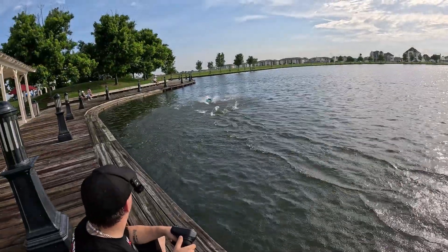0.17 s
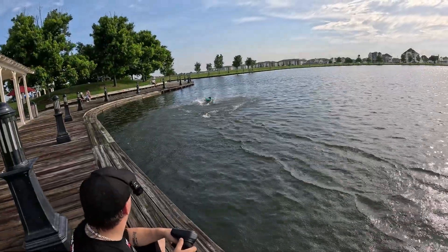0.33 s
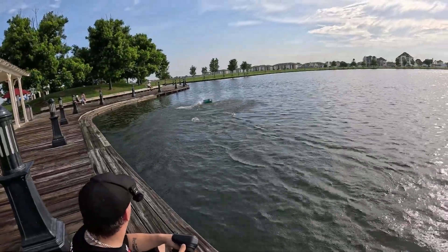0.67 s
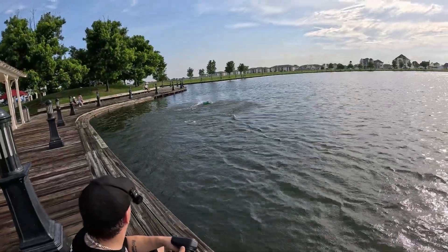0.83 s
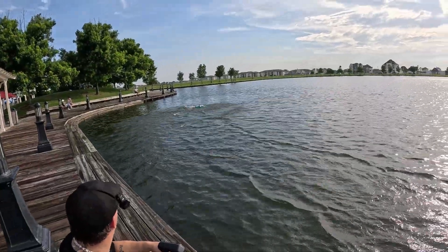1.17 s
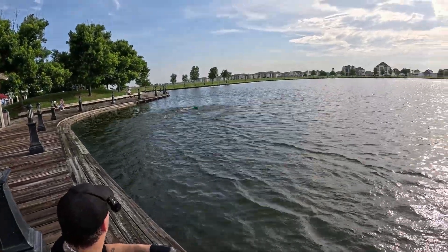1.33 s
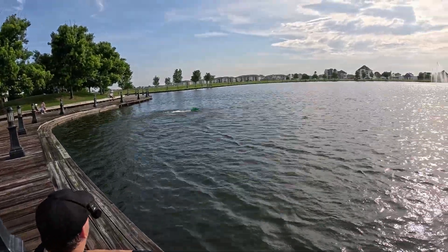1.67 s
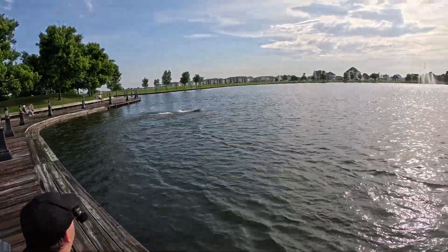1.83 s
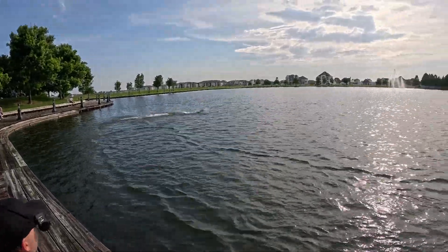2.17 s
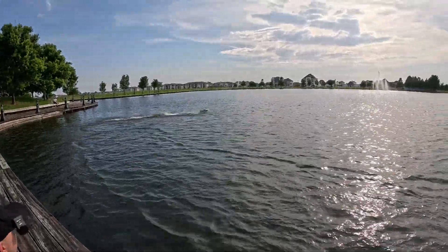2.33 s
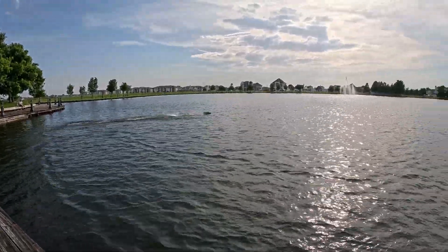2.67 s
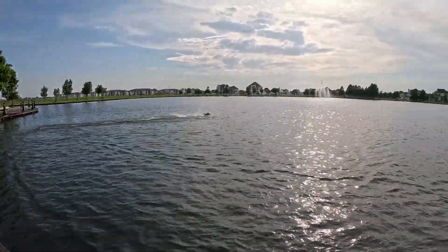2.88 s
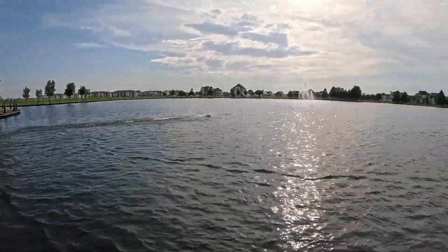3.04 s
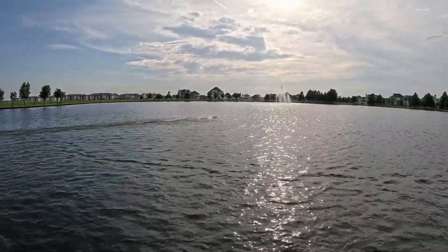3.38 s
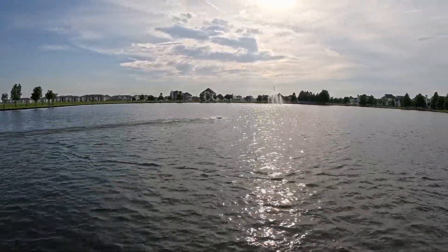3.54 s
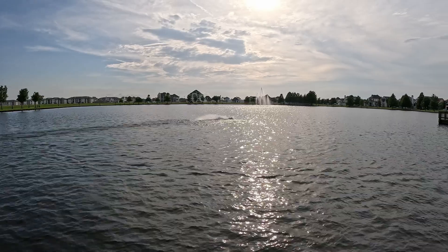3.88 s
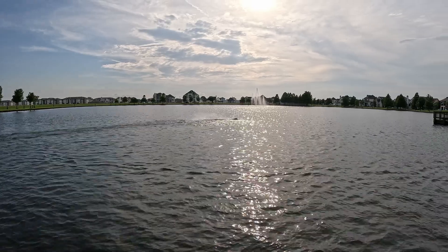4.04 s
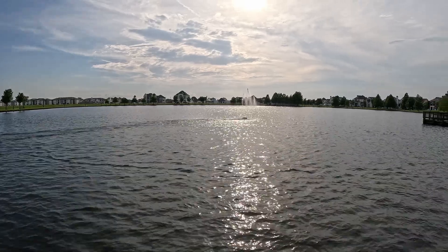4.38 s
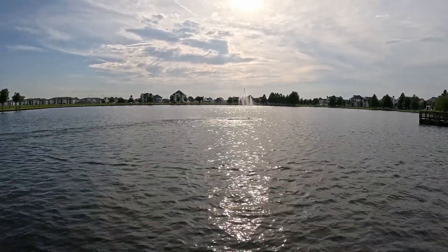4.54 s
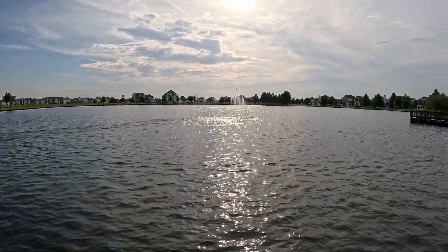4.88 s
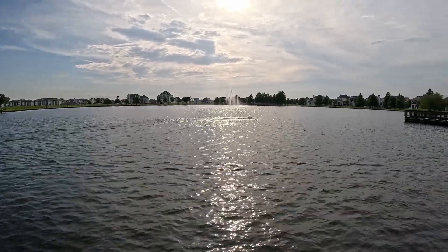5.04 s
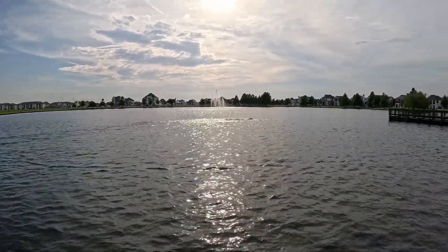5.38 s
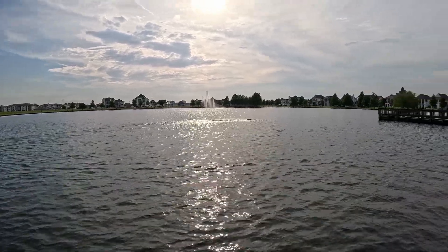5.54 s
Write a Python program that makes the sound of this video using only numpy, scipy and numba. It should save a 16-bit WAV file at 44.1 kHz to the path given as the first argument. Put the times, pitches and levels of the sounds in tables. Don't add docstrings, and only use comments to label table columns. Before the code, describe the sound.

An open pond heard from a wooden deck, with a faint low town drone throughout. From 0 to 1.1 s a toy jet boat coasts: a splash at the start, a rumbling wake that dies away, light plops at about 0.47 and 0.79 s, ticking drips and lapping. At 1.15 s its electric motor whines up, rough and fluttering, with rushing, gurgling water. From 1.64 to 3.2 s it hops repeatedly; each time the pitch leaps and smooths, then drops as the hull slaps down with spray. It cuts out near 3.3 s. A short, hard rev rises and falls from 3.6 to 3.95 s. Quiet lapping and thin far fountain hiss follow; at 4.25 s a small metal tag bounces close by, faster and fainter, for 0.15 s. A last, weaker whine runs from 5.0 to 5.45 s, with a fainter jingle at 5.17 s, a brief hop and slaps, then lapping and drips.

```python
import sys
import numpy as np
from scipy import signal
from scipy.fft import rfft, irfft
from scipy.io import wavfile
from scipy.ndimage import uniform_filter1d
from numba import njit

SR = 44100
rng = np.random.default_rng(int(sys.argv[2]) if len(sys.argv) > 2 else 0)


def linear_from_db(decibels):
    return 10 ** (np.asarray(decibels, float) / 20)


def persist_wave(psi):
    counts = np.round(np.clip(psi, -1, 1) * 32767).astype(np.int16)
    wavfile.write(sys.argv[1], SR, np.atleast_2d(counts).T)


N = 251811
T = np.arange(N) / SR


@njit
def svf(x, hz, width):
    y, band, low = np.empty(len(x)), 0., 0.
    for i in range(len(x)):
        g, k = np.tan(np.pi * hz[i] / SR), width / hz[i]
        v = (band + g * (x[i] - low)) / (1 + g * (g + k))
        band, low, y[i] = 2 * v - band, low + 2 * g * v, k * v
    return y


def unit(x):
    return x / np.sqrt(np.mean(x ** 2))


def curve(points):
    return np.interp(T, *np.transpose(points))


def walk(rate):
    hold = int(SR / rate)
    steps = np.repeat(rng.standard_normal(N // hold + 1), hold)
    return unit(uniform_filter1d(uniform_filter1d(steps, hold), hold)[:N])


def colour(x, spectrum):
    hz, db = np.transpose(spectrum)
    log_hz = np.log(np.arange(1, N // 2 + 2) * SR / N)
    gain = linear_from_db(np.interp(log_hz, np.log(hz), db, left=-80, right=-80))
    return unit(irfft(rfft(x) * gain, N))


def hiss_of(spectrum):
    return colour(rng.standard_normal(N), spectrum)


def grainy(rate, spread_db, share):
    pops = (rng.random(N) < rate / SR) * linear_from_db(spread_db * rng.standard_normal(N))
    pops = signal.lfilter([1], [1, -.98], pops) * rng.standard_normal(N)
    return np.sqrt(1 - share) * rng.standard_normal(N) + np.sqrt(share) * unit(pops)


def ring(hz, t60, count=2000):
    t = T[:count]
    return np.sin(2 * np.pi * hz * t) * np.exp(-np.log(1000) * t / t60)


def add(out, s, sound):
    i = int(s * SR)
    out[i:i + len(sound)] += sound[:N - i]


def highpass(x, order, hz):
    return signal.sosfilt(signal.butter(order, hz, "high", fs=SR, output="sos"), x)


# (frequency [Hz], level [dB per Hz])
HUM = [(12, -54), (20, -16), (27, -42), (67, -4.5), (102, -9), (155, -2.5), (200, -9.5), (236, -1),
       (265, -12.5), (300, -12), (390, -47), (660, -120)]
# (time [s], level [dB])
HUM_FADE = [(1, 2), (2.5, 0.5), (3.6, 2), (4.4, -0.5), (5.5, -0.5)]


def town_hum():
    return linear_from_db(-68 + curve(HUM_FADE) + 2.8 * walk(4.47)) * hiss_of(HUM)


def wash():
    level_db = -61 - 20 * T - 14 * np.exp(-T / 0.03) + 4.1 * walk(13.4)
    return linear_from_db(level_db) * hiss_of([(50, -33), (90, -16), (150, -4), (220, -4), (300, -36)])


# (time [s], lag [ms], strength [0-1])
MIRROR = [(2.1, .88, .03), (2.5, .88, .25), (3.2, .95, .2), (3.7, .89, .45), (4.7, .81, .4),
          (5.71, .74, .32)]


def pond_mirror(boat):
    s, lag_ms, strength = np.transpose(MIRROR)
    return np.interp(T, s, strength) * np.interp(T - np.interp(T, s, lag_ms) / 1000, T, boat)


# (time [s], strength [0-1])
DECK = [(0, .3), (1.2, .3), (1.6, .45), (2.1, .25), (3.1, .25), (3.5, 0)]


def deck_echo(boat):
    return curve(DECK) * np.interp(T - .00052, T, boat)


def far_bank(sound):
    bank = rng.standard_normal(12000) * np.exp(-np.log(1000) * T[:12000] / 0.8)
    return signal.fftconvolve(sound, bank / np.sqrt(np.sum(bank ** 2)))[:N] * linear_from_db(-15)


# (time [s], peak level [dB])
BOUNCES = [(4.2535, -25.5), (4.2753, -23), (4.297, -27.5), (4.3149, -26.5), (4.3313, -29.5), (4.3447, -30),
           (4.357, -34), (4.367, -34.5), (4.376, -37), (4.383, -36), (4.39, -42), (4.3945, -42),
           (5.166, -30.5), (5.1811, -29), (5.1937, -39), (5.204, -36), (5.212, -44), (5.2184, -44)]
# (frequency [Hz], level [dB], t60 [s])
TAG = [(4700, -10, 0.019), (5100, -12.5, 0.014), (5360, -8.5, 0.01), (6750, -7.5, 0.0053),
       (8900, -15, 0.0055), (9500, -1, 0.0029), (10000, 1.5, 0.0026)]
LOW_RING_DB, OTHER_END_DB = -23.5, 9.5
SOFTEN = 0.3


def tag():
    out, t = np.zeros(N), T[:2000]
    chance = rng.standard_normal((len(BOUNCES), len(TAG)))
    crack = hiss_of([(1000, -2.5), (4500, -1), (5400, 2), (8000, -3.0), (10500, -14.0), (11500, -15), (16400, -28)])
    for count, ((s, db), row) in enumerate(zip(BOUNCES, chance)):
        end_db = OTHER_END_DB * (count % 2)
        blow = linear_from_db(LOW_RING_DB + 2.0 + end_db) * ring(2470, 0.027) + linear_from_db(LOW_RING_DB) * ring(1344, 0.052)
        for (hz, mode_db, t60), luck in zip(TAG, row):
            tilt_db = end_db * (np.sign(hz - 4900) - (hz > 8000))
            soft_db = SOFTEN * (db + 25.5) * (hz > 6000)
            blow += linear_from_db(mode_db + luck + tilt_db + soft_db) * ring(hz * (1 + luck / 150), t60)
        blow *= 1 - np.exp(-t / 0.00016)
        blow += linear_from_db(SOFTEN * (db + 21.0) - 3.0) * crack[int(s * SR):][:2000] * np.exp(-t / 0.0019)
        add(out, s + 0.00056, linear_from_db(db - 10.0) * blow)
    return out


# (time [s], peak level [dB], pitch [Hz], centre of the fizz [Hz])
DROPS = [(0.1197, -40, 4700, 7000), (.154, -52, 4500, 6500), (.185, -48, 4790, 6500),
         (.21, -62, 4970, 9500), (0.2229, -43, 3600, 4940), (.258, -61, 6000, 12500),
         (.268, -54, 5000, 9000), (0.3411, -46, 3430, 6000), (0.4025, -47, 3520, 5000),
         (0.448, -51, 4060, 8800), (.538, -64, 6000, 10000), (0.549, -47, 3510, 8140),
         (0.646, -48, 3830, 5570), (.657, -63, 6000, 9000), (.6938, -55, 5360, 6000),
         (.744, -63, 6000, 9500), (1.013, -49, 3970, 5970), (1.0355, -67, 4860, 7000),
         (4.535, -52, 3570, 6500), (4.779, -54, 6210, 6500), (5.5428, -62, 5430, 7000),
         (5.664, -59, 5450, 7000)]


def drops():
    out, t = np.zeros(N), T[:1000]
    for (s, db, hz, fizz_hz), noise in zip(DROPS, rng.standard_normal((len(DROPS), 1000))):
        centre = np.full(1000, 1. * fizz_hz)
        fizz = unit(svf(svf(noise, centre, 4300.0), centre, 4300.0))
        burst = fizz * t / 0.00027 * np.exp(-t / 0.0012)
        add(out, s, linear_from_db(db - 11.5) * (.3 * ring(hz, 0.01, count=1000) + burst))
    return out


# (time [s], peak level [dB], hull ring [Hz], contact [s], spray
# against peak [dB])
SLAPS = [(1.343, -36, 690, 0.0082, -26), (1.409, -33.5, 705, 0.019, -18), (1.619, -23.5, 750, 0.021, -27),
         (1.626, -26.5, 770, 0.0095, -27), (1.638, -28.5, 870, 0.027, -14.5),
         (1.717, -29.5, 560, 0.0087, -9), (1.749, -40.5, 1730, 0.012, -1), (1.761, -28, 820, 0.023, -13.5),
         (1.9357, -23.5, 796, 0.021, -32), (1.949, -31, 1200, 0.03, -6), (2.102, -28.5, 1290, 0.021, -9),
         (2.131, -28.5, 780, 0.011, -21), (2.155, -48, 1470, 0.018, -14), (2.252, -27.5, 1300, 0.03, -12.5),
         (2.412, -36, 1320, 0.013, -5), (2.442, -25.5, 1430, 0.014, -7.5), (2.476, -37, 2130, .012, -5),
         (2.513, -39, 1100, 0.019, -15), (2.559, -29, 900, 0.026, -13.5), (2.568, -37.5, 1240, 0.016, -3.5),
         (2.731, -27.5, 1490, 0.018, -5), (2.737, -44, 2080, .012, -4), (2.8, -39.5, 1130, 0.047, 0),
         (2.858, -34.5, 2035, 0.022, -12), (2.865, -33.5, 1030, 0.017, -15),
         (3.009, -36.5, 1300, 0.0039, -5), (3.05, -31, 1270, 0.0052, -19), (3.06, -27, 1284, 0.015, -10),
         (3.183, -32.5, 957, 0.033, -13), (3.7, -32, 2185, 0.011, -9), (3.731, -35, 920, 0.012, -6),
         (3.76, -39, 2390, 0.009, -23), (3.7613, -34.5, 1133, 0.023, 0.5), (3.764, -30.5, 597, 0.021, -32),
         (3.922, -39, 1103, 0.021, -29), (5.265, -38.5, 1446, 0.028, -15), (5.288, -30.5, 700, 0.02, -29),
         (5.344, -36.5, 1606, 0.051, -9), (5.41, -37.5, 630, 0.02, -11)]
# (time [s], peak level [dB], hull ring [Hz], contact [s], spray against peak [dB])
SPLASHES = [(.072, -38, 695, .012, -16), (0.079, -33, 876, 0.016, -10), (0.092, -43.5, 1790, 0.022, -16),
            (.118, -52, 980, 0.011, -25), (0.223, -53, 1250, .015, -6), (0.272, -49, 1140, 0.045, -1),
            (0.443, -43, 1610, 0.028, -8), (0.461, -49, 600, 0.024, -6), (0.4685, -31.5, 1075, 0.0026, -17),
            (.485, -42, 790, 0.008, -4), (0.595, -54, 1030, 0.0082, 6.5), (0.7869, -32, 1560, 0.0041, -8),
            (0.79, -35.5, 1040, 0.011, -14), (0.81, -54, 497, 0.017, -23), (1.086, -47, 1600, 0.059, -28),
            (3.495, -38.5, 1290, 0.011, -9.5), (4.06, -45.5, 1025, 0.0097, -22),
            (4.143, -44.5, 1470, 0.013, 0.5), (4.435, -51, 1100, 0.047, 3.5),
            (4.565, -40, 604, 0.023, -9.5), (4.647, -51, 1000, 0.023, -3), (4.904, -49, 1540, 0.023, -0.5),
            (4.917, -49, 1300, 0.0062, -2), (4.962, -43.5, 600, 0.051, -23)]
THUD_DB, THUD_GROWTH = -8, 0.81
DIG_IN = 0.14
LEAD_S = .04
COAST_RING_DB = -2
SPRAY_PEAK, SPRAY_SPREAD = 0.3, 0.64


def slaps():
    ring_gain, body_gain, spray_gain, knock, *thud_gain = np.zeros((6, N))
    t, hull_hz = T[:8000], np.full(N, 800.)
    blows = [row + (0,) for row in SLAPS] + [row + (1,) for row in SPLASHES]
    for s, db, hz, contact, spray_db, coasting in sorted(blows):
        hold = np.exp(-(t / max(contact, .003)) ** 2) + 0.25 * np.exp(-t / 0.053)
        swell = (1 - np.exp(-t / (DIG_IN * contact))) * hold
        sheet = swell
        if not coasting:
            sheet = np.exp(-((t - LEAD_S - SPRAY_PEAK * contact) / (SPRAY_SPREAD * contact)) ** 2)
        add(ring_gain, s, linear_from_db(db - 15 + COAST_RING_DB * coasting) * swell)
        add(body_gain, s, linear_from_db(db - 12.5) * swell)
        add(spray_gain, s - LEAD_S * (1 - coasting), linear_from_db(db + spray_db - 8.5) * sheet)
        add(thud_gain[coasting], s, linear_from_db(THUD_GROWTH * (db + 35.5) + THUD_DB - 47.0) * swell)
        hull_hz[int(s * SR):] = hz
        modes = ring(hz, 0.05) + ring(0.8 * hz, 0.015) + 0.26 * ring(1.8 * hz, 0.023)
        onset = np.clip(t[:2000] / (0.0004 if coasting else .002), 0, 1)
        add(knock, s, linear_from_db(db - 6) * modes * onset)
    push = grainy(500, 1.3, 0.41)
    hull = unit(svf(svf(push, hull_hz, 380.0), hull_hz, 380.0))
    body = colour(push, [(400, -4.0), (700, 7.5), (1500, -2.0), (2500, -5.5), (3000, -24)])
    spray = colour(push, [(2600, -4.0), (3400, -2.0), (5500, -5.5), (8000, -16.5), (11000, -26.0), (15800, -43)])
    thud = colour(push, [(90, -44), (150, 2), (220, -10.0), (330, 11.5), (480, -3.0)])
    slosh = colour(push, [(90, -34), (150, 14.5), (220, -1.0), (330, 7.5), (550, -42)])
    thuds = np.sum(uniform_filter1d(thud_gain, size=300) * [thud, slosh], axis=0)
    knock = highpass(knock, 2, 200)
    return knock + ring_gain * hull + body_gain * body + spray_gain * spray + thuds


# (time [s], speed [Hz])
BURSTS = [
    [(1.14, 155), (1.175, 185), (1.2, 248), (1.24, 292), (1.36, 334), (1.48, 341), (2.25, 340), (2.3, 361),
     (3.2, 361), (3.27, 310)],
    [(3.58, 150), (3.64, 268), (3.735, 446), (3.755, 458), (3.785, 440), (3.88, 371), (3.93, 290),
     (3.96, 200)],
    [(5.01, 150), (5.06, 242), (5.12, 325), (5.15, 341), (5.28, 342), (5.35, 385), (5.4, 385), (5.47, 240)],
]
# (take-off [s], landing [s], free shaft speed [Hz], time for the water to load the impeller again [s])
HOPS = [(1.642, 1.765, 477, .034), (1.956, 2.122, 485, .034), (2.255, 2.44, 484, .03),
        (2.572, 2.73, 539, .032), (2.862, 3.055, 538, .034), (3.172, 3.2, 470, .03),
        (5.281, 5.353, 498, .014)]


def shaft():
    hz, unloaded = curve(np.concatenate(BURSTS)), np.zeros(N)
    for off, on, free_hz, bite in HOPS:
        race = 1 - np.exp(-np.maximum(T - off, 0) / .016)
        hop = race * np.clip(1 - (T - on) / bite, 0, 1)
        hz, unloaded = hz + hop * (free_hz - hz), unloaded + hop
    return uniform_filter1d(hz, size=400), unloaded


# (frequency [Hz], level [dB per Hz])
RUSH = [(260, -4), (450, -1.5), (792, 4.5), (859, 2), (1120, 2), (1660, 1), (1890, -4), (2230, -4),
        (3100, -5.5), (4030, -37), (6820, -120)]
# (frequency [Hz], level [dB per Hz])
SPRAY = [(1590, -36), (2700, -5), (2970, -14), (3320, -1.5), (4050, -4.5), (4330, -1.5), (5170, -3.5),
         (5610, -3.5), (7830, -10), (8620, -20), (11600, -24), (15800, -43)]
# (time [s], level [dB])
EFFORT = [(1.12, -71), (1.2, -53.5), (1.28, -54), (1.38, -51), (1.52, -45.5), (1.6, -47.5), (1.66, -46),
          (1.76, -50.5), (1.85, -51), (1.93, -45), (1.97, -46.5), (2.05, -44), (2.2, -45.5), (2.36, -48),
          (2.5, -43.5), (2.85, -48.5), (2.96, -48), (3.2, -47), (3.31, -58), (3.56, -62), (3.67, -51),
          (3.8, -46), (3.9, -48.5), (3.95, -76.5), (5.0, -67), (5.12, -51.5), (5.22, -50), (5.33, -56),
          (5.42, -61), (5.5, -61.5)]
# (time [s], level [dB])
WAKE = [(0, -48.5), (.15, -53.5), (.3, -55.5), (.6, -58), (.92, -60), (3.5, -62.5), (4.3, -58),
        (4.96, -68.5), (5.5, -60.5), (5.71, -62.5)]
# (time [s], hiss [dB], gurgle [dB])
FOUNTAIN = [(1, -107, -75), (3.902, -63.5, -53), (5, -70.5, -58.5)]
# (time [s], tube against the jet [dB], extra spray [dB])
TUBE_HISS = [(1.2, -15, -0.9), (1.7, -11.5, 1.7), (1.85, -21, -3), (2.3, -18, -0.2), (3.2, -18.5, 0),
             (3.7, -14, 2.5), (3.9, -8, 0.3), (5.1, -39, 3), (5.4, -18, 2)]
JET_SPRAY_DB, WAKE_SPRAY_DB, JET_GURGLE_DB = -7, -4.5, -17
JET_MIST_DB, WAKE_MIST_DB = -25, -18
AIRBORNE_RUSH_DB, AIRBORNE_SPRAY_DB, AIRBORNE_GURGLE_DB = -7, -2, 2
CHOP = 0.32


def water(hz, airborne):
    s, churn_db = np.transpose(EFFORT)
    jet = linear_from_db(np.interp(T, s, churn_db, left=-99, right=-99))
    wake = linear_from_db(curve(WAKE))
    s, *columns = np.transpose(FOUNTAIN)
    hiss, babble = (linear_from_db(np.interp(T, s, c)) for c in columns)
    s, *columns = np.transpose(TUBE_HISS)
    tube_db, facing_db = (np.interp(T, s, c) for c in columns)
    turns = np.cumsum(hz * (1 + 0.0026 * walk(50))) / SR
    jet = jet * (1 + CHOP * np.cos(2 * np.pi * turns)) / np.sqrt(1 + CHOP ** 2 / 2)

    rush_gain = np.hypot(jet * linear_from_db(AIRBORNE_RUSH_DB * airborne), wake)
    jet_spray = jet * linear_from_db(JET_SPRAY_DB + facing_db + AIRBORNE_SPRAY_DB * airborne)
    spray_gain = np.hypot(np.hypot(jet_spray, wake * linear_from_db(WAKE_SPRAY_DB)), hiss)
    gurgle_gain = np.hypot(jet * linear_from_db(JET_GURGLE_DB + AIRBORNE_GURGLE_DB * airborne), babble)
    jet_mist = jet * linear_from_db(JET_MIST_DB + AIRBORNE_SPRAY_DB * airborne)
    mist_gain = np.hypot(jet_mist, wake * linear_from_db(WAKE_MIST_DB))

    churn = colour(grainy(900, 8.9, 0.13), RUSH)
    deep = svf(churn, 650 * (1 + 0.17 * walk(8.5)), 740.0)
    heaving = deep * linear_from_db(0.91 * walk(25.05)) + (churn - deep) * linear_from_db(1.17 * walk(25.25))
    rush = rush_gain * linear_from_db(1.93 * walk(40)) * heaving
    droplets = colour(grainy(850, 3.0, .3), [(6500, -39), (8500, 6.0), (11500, -1.5), (15800, -11)])
    mist = mist_gain * linear_from_db(2.0 * walk(24.2)) * droplets
    spray = spray_gain * linear_from_db(1.4 * walk(30)) * colour(grainy(1100, 0.97, 0.36), SPRAY)
    bubbling = hiss_of([(130, -54), (200, -18.0), (300, -9.0), (450, -2.0), (650, -5.0)])
    gurgle = gurgle_gain * linear_from_db(-8.5 + 1.5 * walk(21.66)) * bubbling
    piped = svf(svf(churn, 2280 * (1 + 0.1 * walk(12)), 540.0), np.full(N, 2280.), 980.0)
    tube = jet * linear_from_db(tube_db + 4.2 * walk(40)) * unit(piped)
    return rush + spray + mist + gurgle + tube


# (time [s], first order [dB], second order [dB], higher orders [dB], jet tube ring [dB])
ATTITUDES = [(1.14, -57.5, -64.5, -62.5, 4), (1.25, -53.5, -54.5, -60, 6), (1.31, -53, -54, -57.5, 9),
             (1.374, -64, -58, -53, -3), (1.444, -45, -55, -53, 6), (1.469, -54, -49, -53, 6),
             (1.504, -44, -47, -53, 12), (1.554, -52, -52, -53, 7), (1.59, -59, -49, -52.5, 10),
             (1.618, -44, -44, -56, 4), (1.65, -51, -60, -50, 8), (1.684, -50, -69, -57, 8),
             (1.734, -54, -68, -58.5, 18), (1.761, -51.5, -41.5, -44.5, 14), (1.799, -58, -54, -54, 21),
             (1.853, -51, -51.5, -51, 4), (1.9, -51.5, -55.5, -52, -2), (1.965, -54, -56, -51, 8),
             (2.018, -44.5, -54.5, -53, 1), (2.088, -46.5, -70, -50, 0), (2.13, -55, -56.5, -55.5, 10),
             (2.27, -54, -50, -53, 17), (2.335, -61, -52, -52.5, 8), (2.407, -55.5, -54, -53.5, 8),
             (2.477, -53.5, -49.5, -52, 12), (2.552, -51.5, -57, -57, 9), (2.642, -46, -53, -53, 14),
             (2.701, -45, -62, -50.5, 9), (2.726, -51, -49, -43.5, -2), (2.771, -58, -49, -52, 12),
             (2.811, -53.5, -54, -52, 23.5), (2.855, -49.5, -48, -49.5, 9), (2.92, -59.5, -55, -58, 16),
             (2.99, -74, -53, -52.5, 16), (3.021, -54, -64, -54, -5), (3.085, -52, -75, -54.5, 15.5),
             (3.155, -50.5, -61, -51, 9), (3.19, -47.5, -43, -51, 15), (3.215, -64, -73, -60, 10),
             (3.25, -79, -74, -74, 5),
             (3.58, -68, -77, -65, 4), (3.635, -57, -62, -62, 8), (3.659, -58.5, -65, -51.5, 8.1),
                  (3.73, -46.5, -59, -52, 12), (3.755, -62, -55, -52, 30), (3.78, -45, -57, -56, 10),
                  (3.8, -49, -54, -50, 10), (3.829, -54, -68, -64, 14), (3.86, -53, -57, -59, 14),
                  (3.899, -57, -56, -53, 5), (3.919, -54, -58, -59, 5), (3.94, -80, -90, -89, 10),
                  (5.01, -65.5, -67.5, -66, 4), (5.06, -67, -65, -60, 6), (5.099, -64, -45.5, -57, 15),
                  (5.14, -58, -49.5, -65, 40), (5.18, -54, -63, -61, 22), (5.279, -51, -55, -45, 8),
                  (5.304, -49, -61, -53, 8), (5.354, -49, -54, -55, 8), (5.394, -52, -56, -63, 6),
                  (5.419, -69, -69, -70, 5), (5.45, -69, -83, -88, 10)]
# (frequency [Hz], level [dB])
HULL = [(600, -1.5), (1020, -4), (1085, 1.5), (1450, -1.5), (1620, -11), (1950, -10.5), (2500, -16),
        (3000, -19), (3600, -15), (4320, -13), (4900, -16), (5400, -16.5), (6000, -21.5)]
HALF_DB = -22
TURN_S = 0.014
RACING_DB, BITING_DB = 3, 2.5


def motor(hz, airborne):
    s, *columns = np.transpose(ATTITUDES)
    stage = np.maximum(np.searchsorted(s, T) - 1, 0)
    first_db, second_db, upper_db, ring_db = (uniform_filter1d(c[stage], size=int(TURN_S * SR)) for c in columns)
    hull_hz, hull_db = np.transpose(HULL)
    rough = 1 - 0.475 * airborne
    turns = np.cumsum(hz * (1 + rough * (.004 * walk(40) + .007 * walk(130)))) / SR
    glide = np.clip(np.gradient(hz) * SR / 3000, -2, 2)
    smear_db = 12 * np.abs(glide)
    surge_db = RACING_DB * np.maximum(glide, 0) - BITING_DB * np.minimum(glide, 0)
    out = 0
    for k in range(1, 17):
        if k > 2:
            tube_db = ring_db / (1 + ((k * hz - 2170) / 130) ** 2)
            db = upper_db + np.interp(np.log(k * hz), np.log(hull_hz), hull_db) + tube_db
        else:
            db = (first_db, second_db)[k - 1]
        db = db + (surge_db if k < 2 else -smear_db * min(k / 10, .5))
        db = db + 3.2 * rough * walk(70) + .6 * walk(20)
        out += linear_from_db(db) * np.sin(2 * np.pi * (k * turns + rng.random()))
    bearing = np.cumsum(hz * (2.52 - .22 * airborne)) / SR
    lines = np.sin(2 * np.pi * bearing) + linear_from_db(-7.5) * np.sin(2 * np.pi * (bearing + 2 * turns))
    out += linear_from_db(upper_db - smear_db - 6.0 + 0.69 * airborne + 1.0 * walk(57)) * lines
    for half in (1.5, 3.5, 4.5, 5.5):
        ragged = linear_from_db(upper_db - smear_db + HALF_DB + 5.0 * walk(49))
        out += ragged * np.sin(2 * np.pi * (half * turns + rng.random()))
    fade = sum(np.clip(np.minimum(T - burst[0][0], burst[-1][0] - T) / 0.0036, 0, 1) for burst in BURSTS)
    return np.sqrt(2) * out * fade


def scene():
    hz, airborne = shaft()
    whine = motor(hz, airborne)
    boat = highpass(water(hz, airborne) + slaps() + drops(), 4, 70)
    near = 0.7 * (boat + pond_mirror(boat) + deck_echo(boat))
    mix = near + linear_from_db(-1.0) * whine + far_bank(boat + whine) + tag() + town_hum() + wash()
    return mix[None]


def top_cut(x):
    return signal.sosfilt(signal.butter(12, 16400, fs=SR, output="sos"), x)


def record(dry):
    top = signal.ellip(10, .2, 60, 16350, fs=SR, output="sos")
    mix = signal.sosfilt(top, dry)
    return top_cut(mix)


dry = scene()
out = record(dry)
persist_wave(out)
```